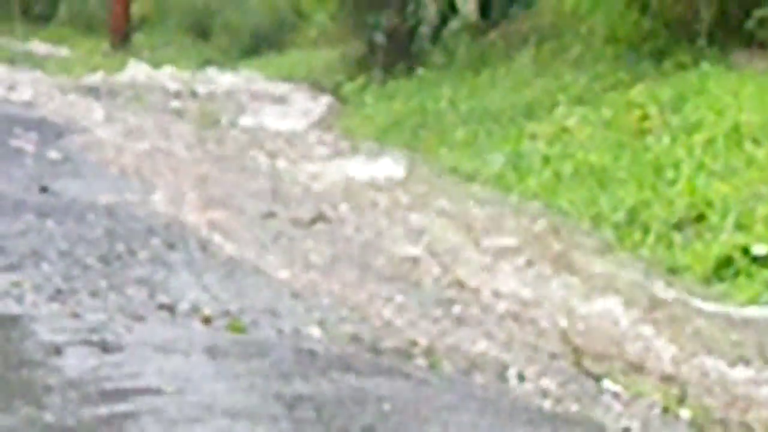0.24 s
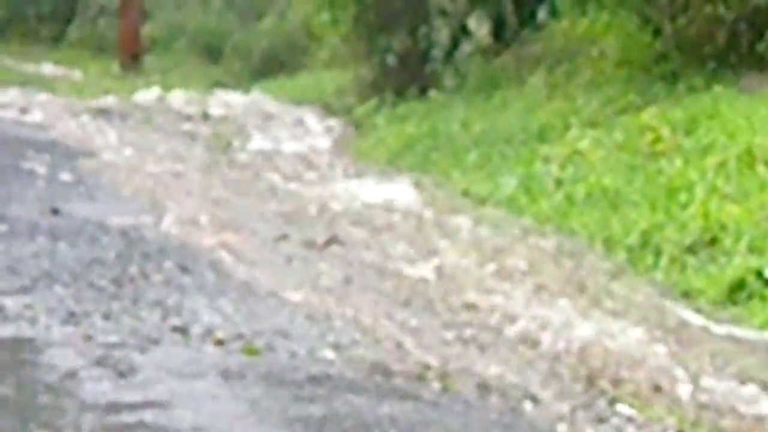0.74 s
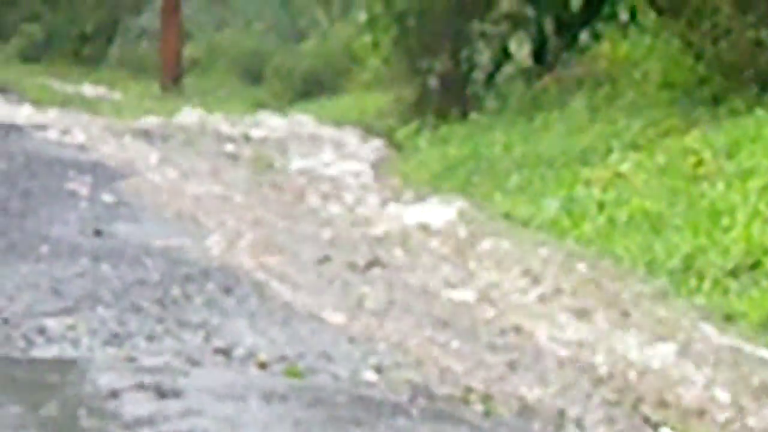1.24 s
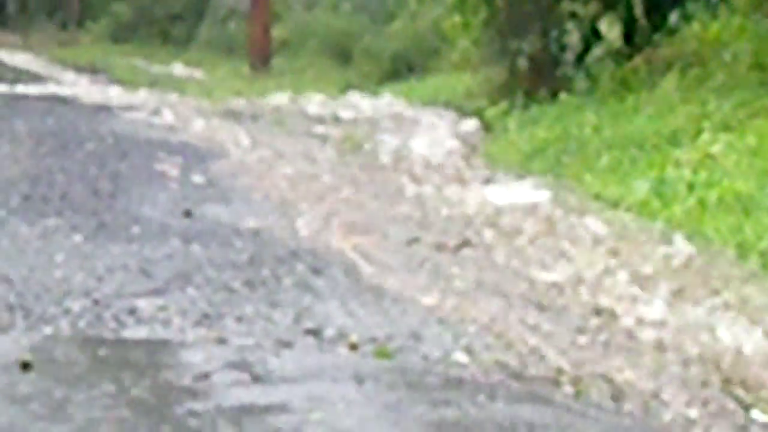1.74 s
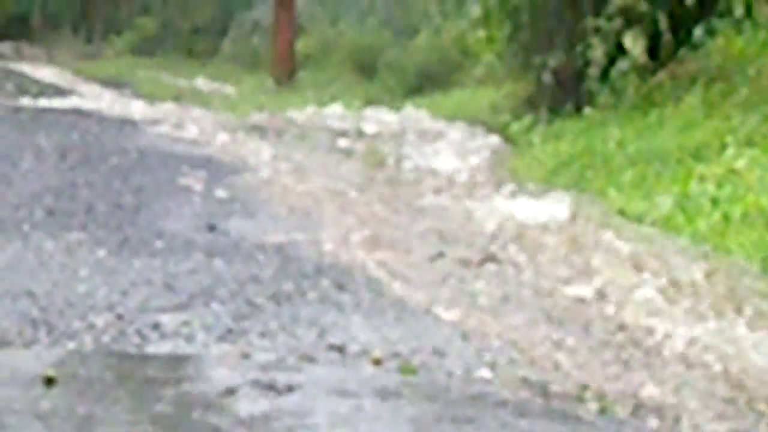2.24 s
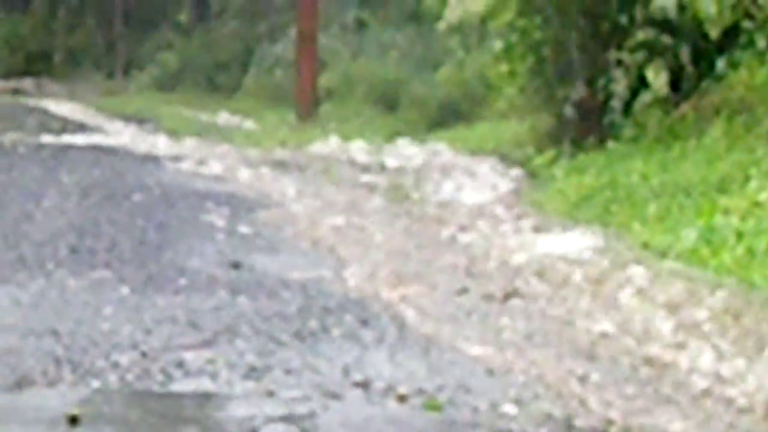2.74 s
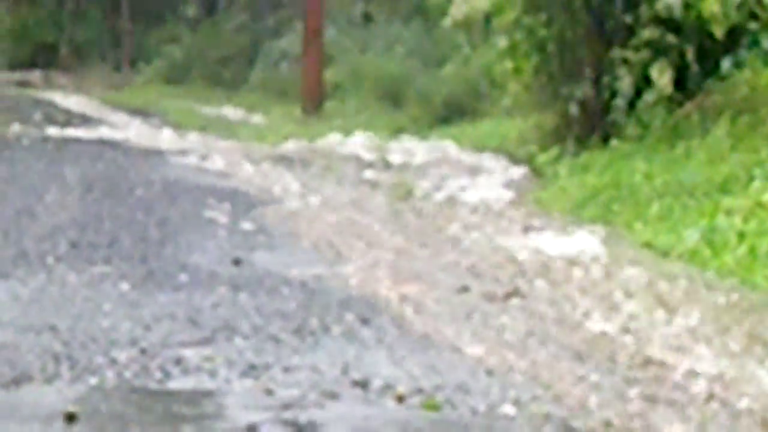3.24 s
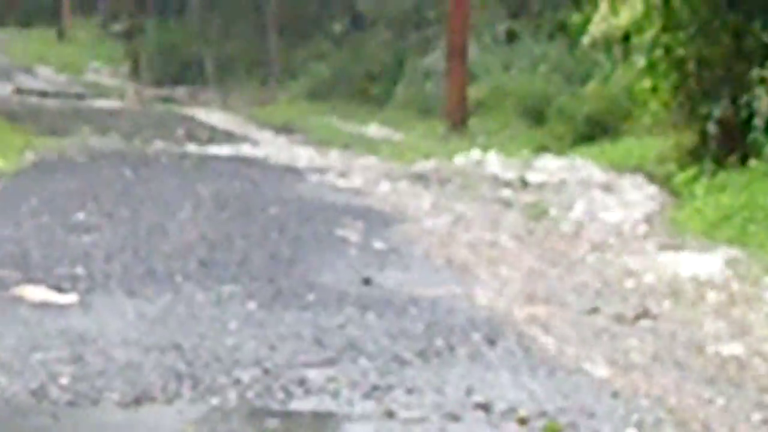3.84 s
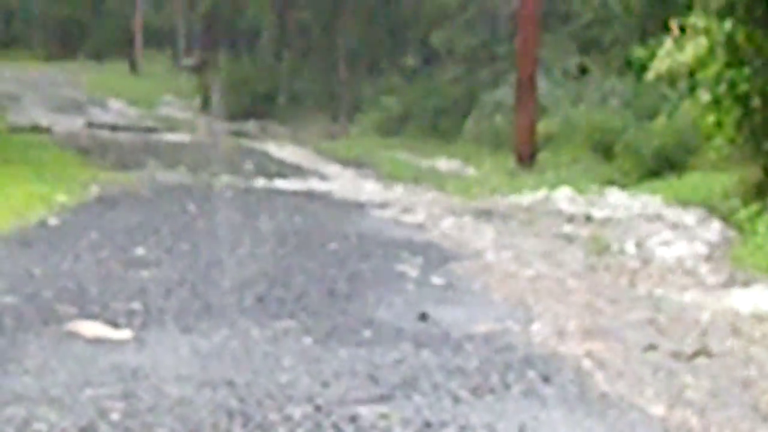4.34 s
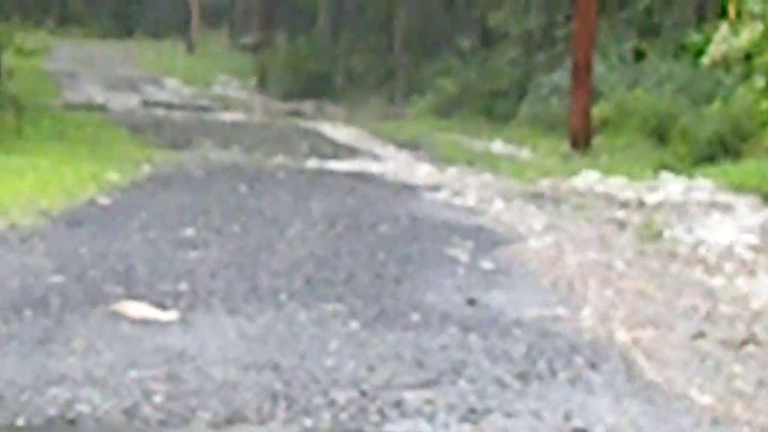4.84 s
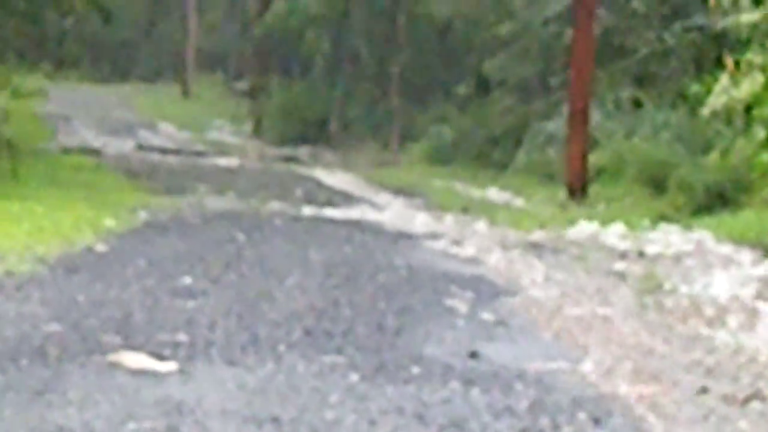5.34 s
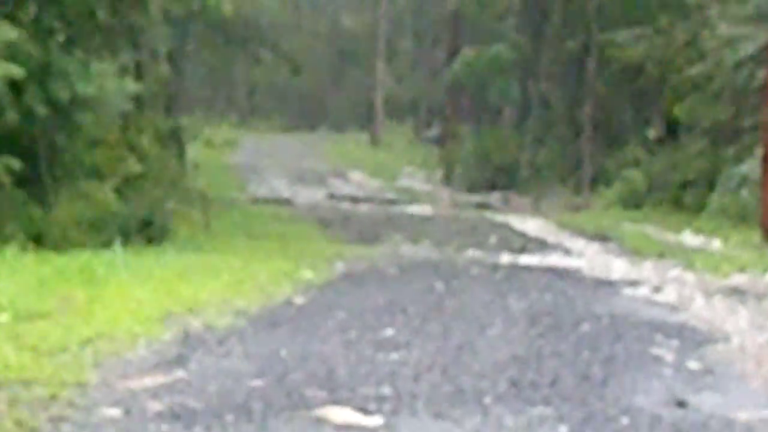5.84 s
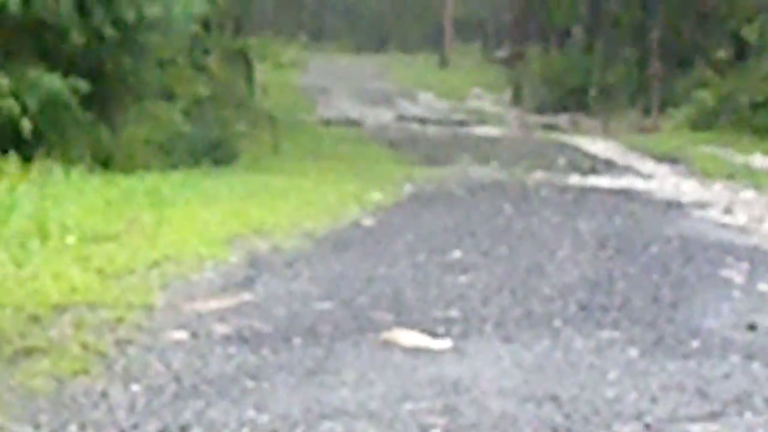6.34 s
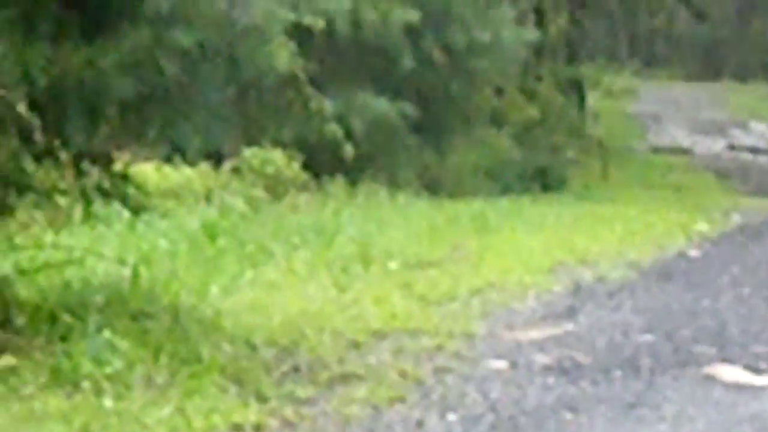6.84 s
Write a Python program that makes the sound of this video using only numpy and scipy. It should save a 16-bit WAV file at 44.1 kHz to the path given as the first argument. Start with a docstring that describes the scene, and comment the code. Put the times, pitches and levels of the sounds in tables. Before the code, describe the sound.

Outdoors in heavy rain, a single hand-held microphone picks up the continuous splashy rush of water flowing over a gravel road, with a thin hiss of rain above it. Close, dry ticks and knocks come unevenly as drops land on the microphone's plastic housing. One loud crack near three seconds ducks the sound for a moment, and more taps follow while the water carries on, a little quieter.

```python
"""A gravel road in heavy rain, flood water rushing along it, heard from a small hand-held camera
with one microphone. Rain hisses on the leaves and stones around. Now and then a drop strikes the
camera itself; the hardest overload it, and the gain control ducks everything and creeps back."""
import sys
import numpy as np
from scipy import signal
from scipy.fft import rfft, irfft, next_fast_len
from scipy.io import wavfile
from scipy.ndimage import uniform_filter1d

SR = 44100
rng = np.random.default_rng(int(sys.argv[2]) if len(sys.argv) > 2 else 0)


def store_wav(level_fs):
    """Save 16-bit WAV to argv[1]."""
    pcm = np.round(np.clip(np.atleast_2d(level_fs), -1, 1) * 32767)
    wavfile.write(sys.argv[1], SR, pcm.T.astype(np.int16))


N = 313551

# The water on the road, as it sounds at the camera: frequency_hz, relative_level_db
WATER_SPECTRUM = [(30, 11), (100, -8), (186, -4.5), (334, -6.5), (543, -1), (781, -3), (1120, -3.5),
                  (1400, -7), (1820, -8.5), (2520, -6.5), (2900, -7.5), (3900, -3.5), (4910, -7.5),
                  (6300, -18), (7500, -21), (9750, -38)]
# How near the water sounds as the camera turns: time_s, level_db
WATER_NEARNESS = [(0, -18), (1.6, -19.5), (2.4, -19), (3.4, -20), (4.8, -20.5), (6.2, -22.5), (7.11, -20)]
def flood_water():
    """Water rushing over gravel: a broad roar thick with small splashes."""
    rush = wash(WATER_SPECTRUM, patchy_db=.78, flicker_db=.55, splashes_per_s=1500, spread_db=2.9,
                splash_db=-7)
    return gain_of(nearness_db()) * rush


def nearness_db():
    """The water's level glides as the camera turns."""
    return np.interp(np.arange(N) / SR, *np.transpose(WATER_NEARNESS))


# Drops landing on the camera, right by the microphone: start_s, knock_db, pitch_hz, tick_db
CAMERA_HITS = [(.0099, 6, 3280, -3), (.8028, -3, 3900, -17), (2.0022, -18, 3900, -16),
               (2.2885, 3.5, 3300, -28), (2.7109, 21.5, 3480, -4), (2.794, -15, 3900, -12),
               (3.0396, -2, 1800, 3), (3.4162, -1, 3800, -14), (3.5596, -18, 3900, -22),
               (3.8893, 10, 3740, -7), (4.079, -3.5, 1720, -28), (4.1752, -22, 3900, -21),
               (4.4937, -2.5, 2450, -2.5), (4.6203, 6, 2600, 2), (5.0225, -1, 3800, -10),
               (5.2447, -3, 3900, -17), (5.9562, -18, 3900, -22), (6.751, 0, 1268, -22),
               (7.0004, 1.5, 1602, -31)]
# Resonances of its plastic shell: pitch_hz, level_db, t60_s
SHELL_MODES = [(5740, 3.5, 0.0018), (8930, -1.5, 0.002), (10800, 3.5, 0.0013), (13900, 3, 0.0017)]
def drops_on_camera():
    """Each blow knocks a panel, ticks the shell, rings the microphone port and shoves the membrane."""
    shell = sum((-1) ** k * gain_of(db) * ring(hz, t60_s, rise_s=.00004)
                for k, (hz, db, t60_s) in enumerate(SHELL_MODES))
    port = gain_of(-.5) * ring(hz=4000, t60_s=.0047, rise_s=.00009)
    shove = -ring(hz=625, t60_s=.0084, rise_s=.00013)
    length = len(shove)
    out = np.zeros(N + length)
    for start_s, knock_db, pitch_hz, tick_db in CAMERA_HITS:
        knock = ring(pitch_hz, t60_s=10.1 / pitch_hz, rise_s=.00012)  # dies in 10.1 swings
        at = round(start_s * SR)
        out[at:at + length] += gain_of(knock_db) * knock + gain_of(tick_db) * (shell + port)
        # the shove arrives just before the knock and grows faster than it
        early = round((start_s - .0005) * SR)
        out[early:early + length] += gain_of(-30 + 2.02 * knock_db) * shove
    return out[:N]


# The rain all around the camera: frequency_hz, relative_level_db
RAIN_SPECTRUM = [(3000, -22), (6000, -10.5), (8500, 3), (11000, 0), (13000, -2.5), (14500, -6),
                 (15500, -13)]
def rain():
    """Rain on leaves and stones: a high hiss with sparse splashes, partly following the water's level."""
    hiss = wash(RAIN_SPECTRUM, patchy_db=.58, flicker_db=.57, splashes_per_s=60, spread_db=4.8,
                splash_db=-10)
    return gain_of(-21 + .81 * nearness_db()) * hiss


def wash(spectrum, patchy_db, flicker_db, splashes_per_s, spread_db, splash_db, size=512):
    """Noise in drifting patches with a shared flicker, plus splashes, all in one colour at rms 1."""
    hop = size // 4
    frames = N // hop + 5
    real, imag, patches = rng.standard_normal((frames, size // 2 + 1, 3)).T
    patches = uniform_filter1d(patches, size=8, axis=0)  # across frequency
    patches = unit_rms(uniform_filter1d(patches, size=24, axis=1))  # across time
    flicker = unit_rms(uniform_filter1d(rng.standard_normal(frames), size=10))
    swell = gain_of(patchy_db * patches + flicker_db * flicker)
    noise = signal.istft((real + 1j * imag) * swell, nperseg=size, noverlap=size - hop)[1][:N]
    splashes = gain_of(spread_db * np.minimum(rng.exponential(1, N), 4)) * rng.choice([-1., 1.], N)
    splashes *= rng.random(N) < splashes_per_s / SR
    mixed = unit_rms(noise) + gain_of(splash_db) * unit_rms(splashes)
    hz, db = np.transpose(spectrum)
    padded = next_fast_len(N)
    bin_hz = np.fft.rfftfreq(padded, 1 / SR)
    colour = gain_of(np.interp(np.log(bin_hz + 1), np.log(hz + 1), db, left=-70, right=-70))
    return unit_rms(irfft(rfft(mixed, padded) * colour, padded)[:N])


def ring(hz, t60_s, rise_s):
    """A dying sine with a soft start, swinging inward first."""
    t = np.arange(1500) / SR
    attack = 1 - np.exp(-t / rise_s)
    return -attack * gain_of(-60 * t / t60_s) * np.sin(2 * np.pi * hz * t)


def gain_of(db):
    """Decibels to a factor."""
    return 10 ** (np.asarray(db) / 20)


def unit_rms(x):
    """Scales to rms 1."""
    return x / np.sqrt(np.mean(x ** 2) + 1e-20)


def scene():
    """Water, drops and rain meet at one microphone."""
    return np.tile(flood_water() + drops_on_camera() + rain(), (2, 1))


def low_pass(x, hz):
    """Steep band limit."""
    return signal.oaconvolve(x, signal.firwin(1023, hz, window=("kaiser", 9), fs=SR), "same")


def gain_control(x, knee_db=-10.5, slow_most_db=4.0, slow_db_per_s=2.5, quick_s=.079, lag_s=.0019):
    """Power over the knee lowers the gain a moment late; the first few dB return slowly, the rest fast."""
    t = np.arange(N) / SR
    power = signal.lfilter(np.ones(44) / 44, 1, x ** 2)  # 1 ms average
    over_db = np.maximum(10 * np.log10(power + 1e-12) - knee_db, 0)
    creep_db = slow_db_per_s * t
    slow_db = np.maximum.accumulate(np.minimum(over_db, slow_most_db) + creep_db) - creep_db
    log_rest = np.log(np.maximum(over_db - slow_most_db, 1e-9))
    quick_db = np.exp(np.maximum.accumulate(log_rest + t / quick_s) - t / quick_s)
    lag = np.exp(-1 / (lag_s * SR))
    duck_db = signal.lfilter([1 - lag], [1, -lag], np.maximum(slow_db, 0) + quick_db)
    return x / gain_of(duck_db)


# Narrow filters inside the camera: centre_hz, width_hz
CAMERA_NOTCHES = [(7870, 350), (9000, 52), (10000, 86)]
def record(dry):
    """The camera: microphone band, gain control, overload, notches, band limit; both channels alike."""
    x = signal.sosfilt(signal.butter(5, 178.3, "high", fs=SR, output="sos"), dry[0])
    x = gain_control(low_pass(x, hz=15690))
    x = np.clip(x, -.68, .68)  # overload
    for centre_hz, width_hz in CAMERA_NOTCHES:
        x = signal.lfilter(*signal.iirnotch(centre_hz, centre_hz / width_hz, SR), x)
    return np.tile(low_pass(x, hz=16600), (2, 1))


dry = scene()
out = record(dry)
store_wav(out)
```